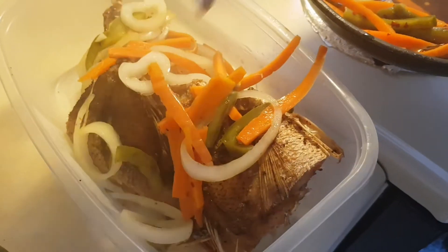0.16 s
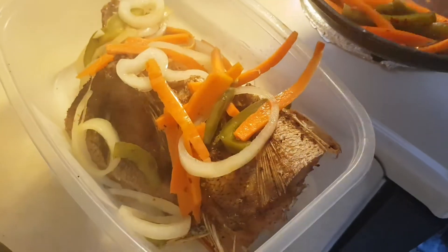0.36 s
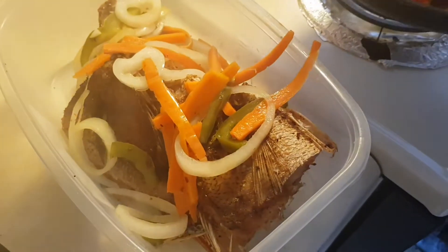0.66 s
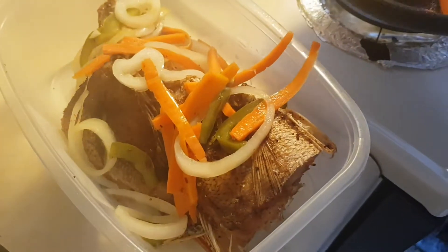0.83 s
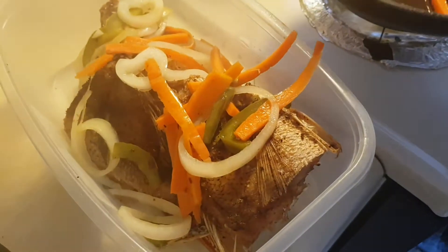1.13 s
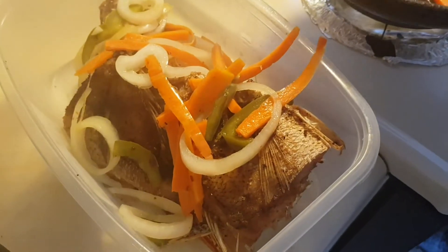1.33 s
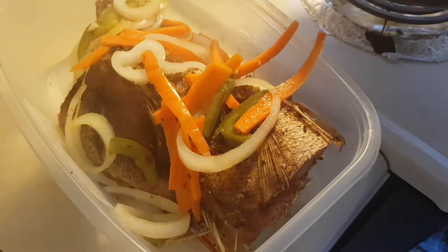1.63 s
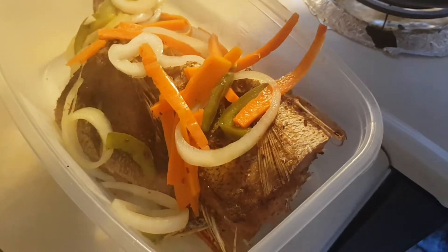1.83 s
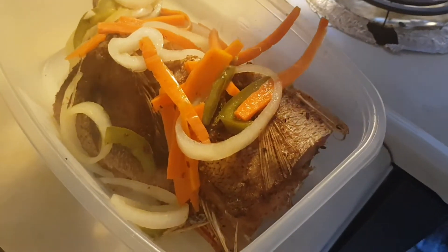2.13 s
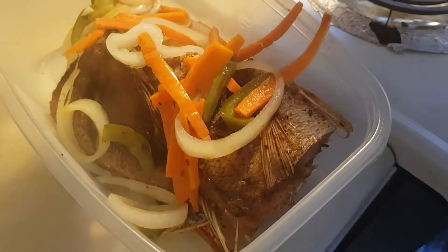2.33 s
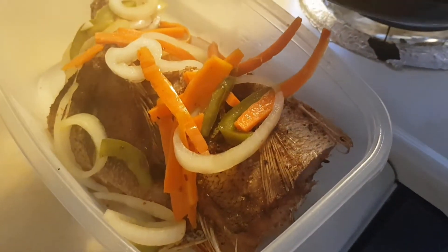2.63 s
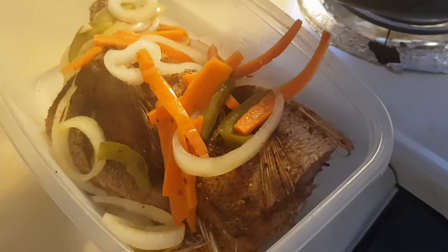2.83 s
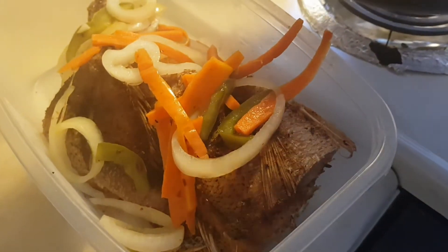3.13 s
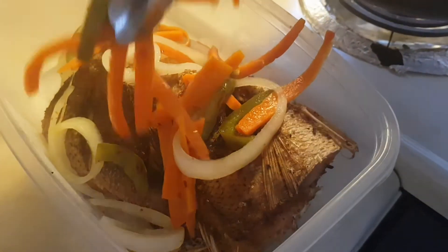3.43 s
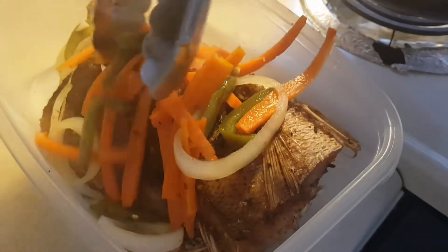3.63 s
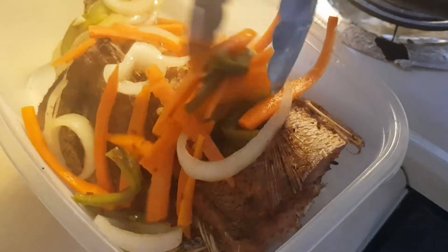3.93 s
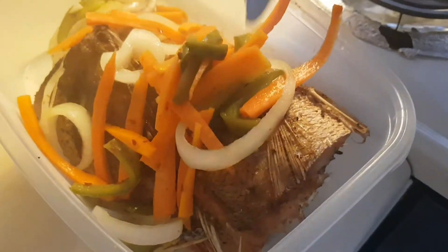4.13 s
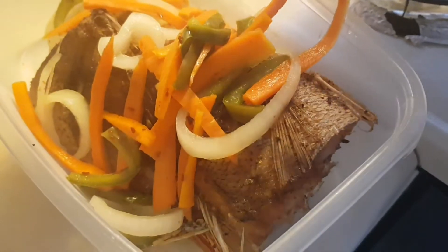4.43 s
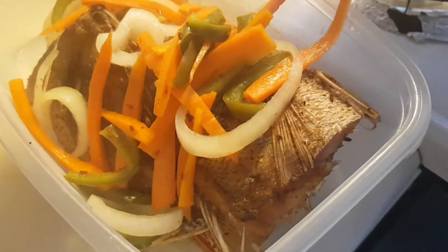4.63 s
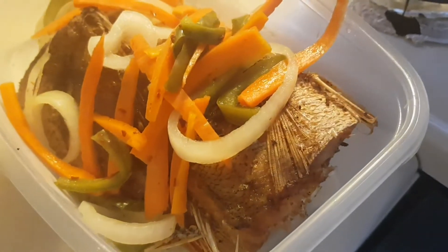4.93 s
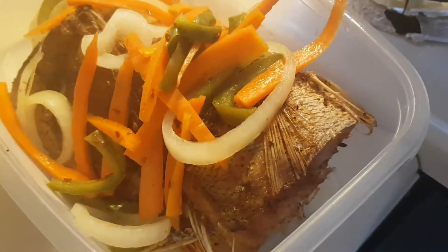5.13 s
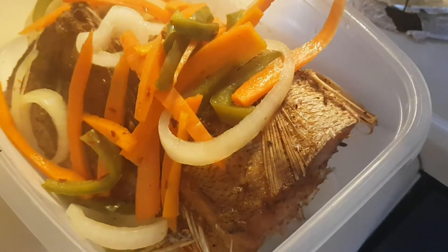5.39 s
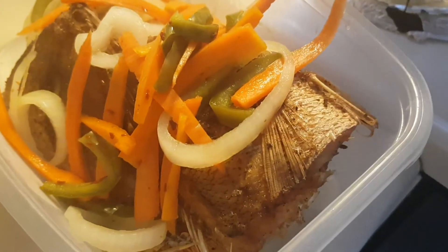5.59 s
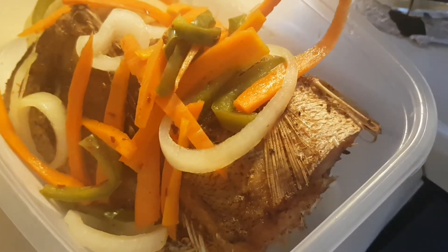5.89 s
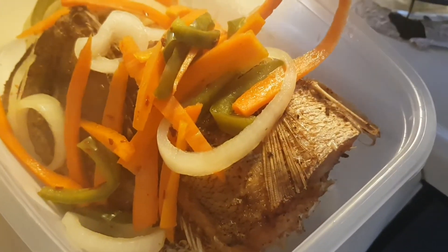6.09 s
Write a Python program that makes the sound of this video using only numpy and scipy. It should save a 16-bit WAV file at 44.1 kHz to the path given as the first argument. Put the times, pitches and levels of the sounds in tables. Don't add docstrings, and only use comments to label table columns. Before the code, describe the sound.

A small, hard-surfaced kitchen heard closely in stereo, with a low fridge motor hum, soft coolant burbling and faint hiss throughout. At the start wet strips land with a tiny hollow plop and slight ticks. Around 0.6 s tongs lightly tap a thin metal pan on the right and drag briefly. At 1.12 s comes the loudest clank, a quick double blow with a duller second half, followed by a scrape until about 1.4 s, a bright tap at 1.47 and a light drag. From 1.8 to 4.6 s only faint tip ticks and soft wet slips emerge, the background rising slightly after 3.5. A sharp closed-tong hit at 4.64 leads to a swelling scrape; a ringing tap at 5.05 and short hit at 5.17 precede a softer drag. A last tap at 5.78 opens a firm, squeaky scrape near 5.95, fading into faint rubbing and a wet slip by 6.2.

```python
import sys
import numpy as np
from scipy import signal
from scipy.fft import rfft, irfft, next_fast_len
from scipy.io import wavfile
from scipy.ndimage import map_coordinates

SR = 44100
rng = np.random.default_rng(int(sys.argv[2]) if len(sys.argv) > 2 else 0)


def master(y):
    cut = np.clip(np.atleast_2d(y).T, -1, 1)
    pcm = np.round(cut * 32767)
    wavfile.write(sys.argv[1], SR, pcm.astype(np.int16))


def elevation(decibels):
    levels = np.asarray(decibels, float)
    return 10 ** (levels / 20)


N = 275801


def unit(x):
    return x / np.sqrt(np.mean(np.abs(x) ** 2) + 1e-20)


def along(points, hz):
    f, v = np.transpose(points)
    return np.interp(np.log(hz + 1), np.log(f + 1), v)


def wobble(rate_hz, size=N):
    knots = rng.standard_normal(int(size * rate_hz / SR) + 4)
    return map_coordinates(knots, [np.arange(size) * rate_hz / SR])


def filtered(x, response):
    n = x.shape[-1]
    m = next_fast_len(n + SR // 8)
    return irfft(rfft(x, m) * response(np.fft.rfftfreq(m, 1 / SR)), m)[..., :n]


def modes(peaks):
    def mode(f, c, w, db):
        return elevation(db) * 1j * f * w / (c * c - f * f + 1j * f * w)
    return lambda f: sum((-1) ** k * mode(f, *peak) for k, peak in enumerate(peaks))


def colour(spectrum):
    return lambda f: elevation(along(spectrum, f))


def normed(response):
    size = np.sqrt(np.mean(np.abs(response(np.linspace(0, SR / 2, num=2500))) ** 2))
    return lambda f: response(f) / size


def grit(spike_db, *shape):
    spikes = np.minimum(rng.exponential(size=shape[-1]), 7)
    return unit(rng.standard_normal(shape) * elevation(spike_db * spikes))


def add_at(out, s, sound):
    out[:, round(s * SR):][:, :sound.shape[-1]] += sound


def placed(pair, alike, lean, lag_s):
    turn = lambda f: np.arccos(np.clip(along(alike, f), -1, 1)) / 2
    mid, side = filtered(pair, lambda f: np.array([np.cos(turn(f)), np.sin(turn(f))]))
    sign = np.array([[1], [-1]])
    ear = lambda f: elevation(along(lean, f) / 2 * sign) * np.exp(-1j * np.pi * f * lag_s * sign)
    return filtered(np.array([mid + side, mid - side]), ear)


# t/s, peak level/dB, knock below peak/dB, brightest f/Hz, t60/s
BLOWS = [
    (0.61, -30, -21, 8300, 0.17),
    (1.1202, -8, -22, 4920, 0.13),
    (1.1637, -19, -2.5, 8550, 0.071),
    (1.474, -21.5, -10, 9430, 0.14),
    (4.639, -13, -16.5, 5340, 0.059),
    (5.0521, -13, -30, 5240, 0.088),
    (5.1749, -11.5, -18.5, 6450, 0.018),
    (5.7769, -18.5, -18, 4950, 0.052),
]
# f/Hz, level/dB per Hz
CLANK = [(710, -39), (1200, 13), (2320, -5), (2620, -5), (2960, -4), (4030, -3.5), (4970, -8), (6690, -9),
         (8620, -6.5), (13400, -19), (16700, -34)]
# f/Hz, width/Hz, level/dB
PAN = [(321, 97, -3), (522, 6, -0.5), (660, 26, 4.5), (860, 13.5, 5), (1092, 27, 10.5)]
# f/Hz, width/Hz, level/dB
STEEL = [
    [(1850, 57, -3), (4730, 39, 3), (5300, 38, 2), (8550, 88, -3), (11700, 36, -10)],
    [(2270, 29, 3), (5040, 26, -3), (6180, 23, -1), (7400, 90, -14), (11900, 23, -13)],
    [(3750, 110, -7), (6080, 130, -7), (8300, 97, -12), (9480, 160, -8), (10100, 140, -4)],
    [(3770, 110, -2), (6950, 83, 0), (8130, 260, -8), (10200, 160, -6), (11800, 120, 7.5)],
    [(5050, 45, 0), (6300, 42, -8), (7200, 120, -6), (7850, 41, -6), (9070, 55, 1)],
    [(3720, 48, 2), (4050, 27, -4), (4970, 47, 7), (8730, 30, -4), (13300, 54, -5)],
    [(1920, 29, 0), (3970, 35, 4), (6260, 65, -8), (7400, 31, -5), (8700, 92, -11)],
    [(1810, 150, 7), (3730, 32, -2), (5060, 82, 0), (6420, 22, 4), (8370, 33, -12)],
]
# f/Hz, width/Hz, level/dB
ARMS = [
    [(2940, 86, 11.5), (4920, 150, 5), (6030, 160, 9)],
    [(5240, 180, 17), (5980, 180, 8), (8520, 170, 12)],
]
THIN_HZ = [1980, 1940]
TREBLE_DB_PER_OCT, LEAD_DB = [-11, -2.5], [-20, -14]
FREE_DB_PER_S, STEEL_DB = 77.5, 5


def blows():
    lead_s = 0.004
    out, t = np.zeros((2, N + SR)), np.arange(SR // 4) / SR - lead_s
    hit = t >= 0
    for (s, db, knock_db, hz, t60), ring in zip(BLOWS, STEEL):
        closed = s > 2
        lead = (t < 0) * elevation(LEAD_DB[closed] + 3500 * t)
        decay = elevation(-60 * t / 0.028) + 0.39 * elevation(-60 * t / t60) + 0.022 * elevation(-60 * t / 1.2)
        shape = lead + hit * decay
        slope_db = TREBLE_DB_PER_OCT[closed] + FREE_DB_PER_S * t60
        thin = lambda f: 1 / (1 + (THIN_HZ[closed] / (f + 1)) ** 6)
        tilt = lambda f: elevation(slope_db * np.log2((f + 500) / 5000)) * thin(f)
        favour = lambda f: 1 + 0.55 * np.exp(-np.log2((f + 1) / hz) ** 2 / 0.12)
        bright = lambda f: colour(CLANK)(f) * tilt(f) * favour(f)
        damped = [(c, max(w, 90), level + STEEL_DB - along(CLANK, c) / 2) for c, w, level in ring]
        resonant = modes(damped + ARMS[closed] + [(hz, 200, 7)])
        steel = normed(lambda f: bright(f) * (elevation(3.5) + resonant(f)))
        shove = hit * elevation(-60 * t / 0.0006) * [[1], [0.3]]
        clank = filtered(shape * grit(1.5, 2, len(t)) + 3 * shove, steel)
        push = 3.5 * shove + 0.2 * hit * elevation(-60 * t / 0.1) * grit(1.5, 2, len(t))
        body = [(c, max(w, 40), level) for c, w, level in PAN]
        knock = filtered(push, normed(modes(body + [(1560, 1900, -4.5)])))
        add_at(out, s - lead_s, elevation(db - 5.5) * (clank + elevation(knock_db + 7.5) * knock))
    return out[:, :N]


# t/s, peak level/dB, f/Hz, t60/s
CHIMES = [
    (1.121, -22, 2343, .12),
    (1.123, -24, 3010, 0.1),
    (1.121, -27, 3810, 0.091),
    (1.121, -32, 9600, .04),
    (1.124, -36, 658, 0.36),
    (4.64, -19, 8500, .03),
    (5.054, -25, 8500, 0.027),
    (5.053, -22, 5270, 0.032),
    (5.175, -20, 6100, .025),
    (5.777, -25, 5100, 0.032),
]


def chimes():
    out, t = np.zeros((2, N + SR)), np.arange(SR // 8) / SR
    for s, db, hz, t60 in CHIMES:
        main = np.sin(2 * np.pi * hz * t + np.array([[0], [1.3]]))
        pair = main + 0.2 * np.sin(2 * np.pi * hz * 0.95 * t)
        onset = 1 - np.exp(-t / 0.0026)
        add_at(out, s, elevation(db - 60 * t / t60) * onset * pair * [[1], [0.3]])
    return out[:, :N]


def dense(t60):
    t = np.arange(SR // 8) / SR
    ring = rfft(unit(rng.standard_normal(len(t)) * elevation(-60 * t / t60)), SR) / np.sqrt(len(t))
    return lambda f: 0.65 + ring[np.round(f).astype(int)]


# t/s, level/dB
STROKES = [
    [(0.614, -38.5), (0.626, -45), (0.64, -44.5), (0.738, -41.5), (0.78, -69)],
    [(1.49, -53), (1.542, -53.5), (1.564, -49.5), (1.616, -49.5), (1.65, -51.5), (1.728, -62.5),
     (1.734, -66), (1.76, -70)],
    [(4.66, -45), (4.67, -45), (4.71, -39.5), (4.774, -32), (4.794, -35), (4.83, -62)],
    [(5.24, -52.5), (5.275, -44), (5.385, -41.5), (5.42, -66)],
    [(5.83, -55), (5.868, -41.5), (5.922, -33.5), (5.962, -34.5), (6.0, -37.5), (6.035, -43), (6.07, -58)],
    [(6.0, -51), (6.045, -46.5), (6.088, -50.5), (6.124, -49.5), (6.176, -63), (6.24, -54.5)],
]
# t/s, level/dB
LONG_STROKE = [(1.185, -44), (1.207, -47.5), (1.235, -43), (1.259, -35.5), (1.297, -33.5), (1.335, -41),
               (1.395, -45), (1.45, -75)]
# f/Hz, width/Hz, level/dB
TONGS = [
    [(4720, 230, -7.5), (8650, 90, -10)],
    [(3700, 540, -9), (4920, 22, 0), (8200, 200, -14), (9600, 190, -8.5), (11700, 99, -7)],
    [(2280, 63, -13), (8200, 190, -7), (11740, 250, 2)],
    [(8030, 150, -13), (8700, 90, -14)],
    [(3530, 200, -10), (6650, 200, -10), (8700, 170, -10)],
    [(6100, 90, -12), (9900, 150, -12), (11570, 92, -5)],
    [(2660, 34, -13), (6100, 70, -9)],
]
# f/Hz, width/Hz, level/dB
RINGS = [([(693, 150, -3), (1176, 54, 7)], [(1820, 150, 4), (2370, 52, -7)]), ([(460, 60, -18),
         (810, 19, -10), (930, 19, -6), (1200, 280, -7)], [(1660, 27, -3), (1710, 53, 7.5), (2390, 76, 6)]),
         ([(497, 130, 2), (683, 94, 10.5), (1165, 160, 13.5)], [(1800, 150, -2), (2350, 150, -11)]),
         ([(660, 87, -8.5), (1200, 31, -5.5)], [(1710, 99, 7), (2180, 48, -19)]), ([(705, 81, 4),
         (953, 19, 1)], [(1540, 480, -1), (2170, 29, -4.5)]), ([(476, 160, -5.5), (790, 44, 3.5),
         (1230, 23, 1)], [(1790, 96, 6), (2060, 37, 0)]), ([(467, 110, -14.5), (780, 63, -4),
         (1200, 44, -6.5)], [(1450, 66, -15.5), (1820, 210, -10.5)])]
# low pan/dB, middle pan/dB, treble lift/dB, low pan gain start to end/dB,
# pan brightness at start/dB per octave
GRIP = [(-9.5, -9, 12, 15, -9.5), (1.5, -4.5, 13.5, 11, 10), (9, -2.5, 5.5, -0.5, 2),
        (-9.5, -14.5, 13.5, 10, -5), (-8, -5, 16, 17, -3.5), (-9.5, -5, 9, -7, -2.5), (8, 8, 12, 2, 0)]
NOTCH_HZ = [6800, 7260, 6950, 6800, 6900, 8300, 8000]
# f/Hz, level/dB per Hz
RASP = [(880, -26), (1500, -21), (1780, -7.5), (2150, -6.5), (5310, -9.5), (6050, -12), (6760, -22),
        (9790, -24.5), (15200, -44), (16000, -59), (16500, -79)]
RASP_DB, PAN_DB, MIN_WIDTH_HZ = 3, -3.5, 110


def pressure(rows):
    s, db = np.transpose(rows)
    s = np.r_[s[0] - 0.01, s, s[-1] + 0.01]
    return np.interp(np.arange(N) / SR, s, np.r_[-100, db, -100])


def scrapes():
    out = np.zeros((2, N))
    strokes = sorted([LONG_STROKE, *STROKES], key=lambda rows: rows[0][0])
    for rows, (low, middle), tongs, grip, notch_hz in zip(strokes, RINGS, TONGS, GRIP, NOTCH_HZ):
        low_db, middle_db, treble_db, gain_db, slide_db = grip
        begin_s, end_s = rows[0][0], rows[-1][0]
        part = slice(round((begin_s - 0.03) * SR), round((end_s + 0.13) * SR))
        press_db = pressure(rows)[part] + RASP_DB
        size = len(press_db)
        slips = unit(elevation(1.2 * wobble(85.3, size) + 1.5 * wobble(30.7, size)))
        travel = (np.arange(size) / SR - 0.03) / (end_s - begin_s) - 0.5
        spot = np.pi / 4 * (1 + np.tanh(2.2 * travel + 0.96 * wobble(11.5, size)))
        spots = np.array([[np.cos(spot)], [np.sin(spot)]])

        def force(db):
            return elevation(press_db + db + 1.3 * wobble(40.3, size)) * slips * grit(1.6, 2, size) * spots

        here, there = dense(0.058), dense(0.073)
        crowd = lambda f: np.array([[here(f)], [there(f)]])
        steel = lambda f: colour(RASP)(f) * crowd(f) * (elevation(-14.5) + np.abs(modes(tongs)(f)))
        high = lambda f: 1 / (1 + (notch_hz / (f + 1)) ** 12)
        tips = lambda f: steel(f) * (1 - high(f) + elevation(treble_db) * high(f))
        octave = lambda f: np.log2(np.clip(f, 500, 2600) / 1300)
        lean = lambda f: elevation(slide_db * octave(f) * [[[1]], [[-1]]])

        def pan(peaks):
            wet = modes([(c, max(w, MIN_WIDTH_HZ), db) for c, w, db in peaks])
            return lambda f: wet(f) * (0.4 + crowd(f)) * lean(f)

        bodies = [(0, tips), (PAN_DB + low_db + gain_db * travel, pan(low)), (PAN_DB + middle_db, pan(middle))]
        for level_db, body in bodies:
            out[:, part] += filtered(force(level_db), normed(body)).sum(axis=0)
    return out


# middle t/s, length/s, peak level/dB, f/Hz
SINGS = [(0.618, 0.014, -44, 1850), (0.647, 0.038, -50, 1850), (0.651, 0.048, -48.0, 668),
         (0.662, 0.017, -36, 1870), (0.663, 0.022, -44, 2360), (0.707, 0.037, -46, 664),
         (0.721, 0.024, -46, 780), (0.722, 0.033, -40, 1160), (0.75, 0.016, -43, 2140),
         (1.259, 0.042, -33, 2390), (1.255, 0.084, -35.5, 790), (1.269, 0.038, -34.5, 1810),
         (1.291, 0.013, -24.5, 1850), (1.299, 0.017, -27, 1280), (1.3, 0.018, -28, 1610),
         (1.315, 0.017, -31, 1226), (1.336, 0.026, -26, 1225), (1.504, 0.017, -28.5, 780),
         (1.55, 0.012, -27, 650), (1.573, 0.03, -32.5, 1217), (1.584, 0.04, -38.5, 680),
         (1.603, 0.028, -35, 704), (1.625, 0.012, -36, 726), (1.717, 0.013, -37.5, 1300),
         (4.625, 0.012, -28.5, 550), (4.749, 0.039, -35, 664), (4.774, 0.039, -40, 1720),
         (4.809, 0.019, -33, 1730), (5.185, 0.019, -30, 730), (5.261, 0.021, -42, 704),
         (5.268, 0.018, -48.0, 1650), (5.304, 0.028, -39, 1640), (5.317, 0.04, -42.5, 716),
         (5.337, 0.038, -45, 1450), (5.372, 0.022, -35.5, 1470), (5.375, 0.041, -43, 2120),
         (5.38, 0.021, -36.5, 687), (5.876, 0.02, -34, 1790), (5.941, 0.015, -34, 1790),
         (5.958, 0.014, -26, 1790), (5.976, 0.027, -31.5, 780), (5.982, 0.015, -14, 1790),
         (6, 0.055, -31.5, 1235), (6.008, 0.014, -27, 1790), (6.019, 0.022, -31, 738),
         (6.028, 0.014, -23, 1730), (6.053, 0.018, -34, 1770), (6.121, 0.025, -36, 780),
         (6.246, 0.03, -33, 810),
         (0.636, .016, -32, 4970), (1.265, .045, -33, 4980), (1.3, .035, -36, 3820),
           (1.4, 0.06, -35, 766), (1.638, 0.04, -41, 724), (1.6, 0.032, -40, 1170),
           (1.659, 0.036, -45, 1240), (3.953, 0.028, -50, 2650), (3.955, 0.034, -53, 1600),
           (3.985, 0.01, -49, 1300), (4.743, .018, -36, 6000), (4.786, 0.022, -31, 8030),
           (5.09, .04, -38, 3860), (4.705, .045, -33, 4800), (4.67, .012, -36, 3900),
           (4.772, .014, -26, 3700), (5.892, .02, -34, 4600), (5.897, .024, -32, 4080),
           (5.97, .045, -39, 10100), (5.987, .05, -39, 4600), (5.197, 0.035, -37, 3800),
           (5.923, 0.025, -23.5, 6140)]


def sings():
    half_s, rise, fall = 0.06, 0.43, 0.38
    out, t = np.zeros((2, N + SR)), np.arange(SR // 8) / SR - half_s
    for s, length_s, db, hz in SINGS:
        swell = elevation(db - 2 - 6 * (t / (length_s * np.where(t < 0, rise, fall))) ** 2)
        size = 1 + 0.25 * wobble(148, len(t))
        phase = np.array([[0], [1.3]]) + 0.82 * wobble(67.5, len(t)) + 7 * rng.random()
        tone = size * np.sin(2 * np.pi * hz * t + phase)
        add_at(out, s - half_s, swell * tone * [[1], [0.3]])
    return out[:, :N]


# t/s, peak level/dB, centre f/Hz, t60/s
TOUCHES = [(0.039, -49.5, 1820, 0.24), (0.2727, -38, 1310, 0.036), (0.8275, -50, 1490, 0.086),
           (1.215, -47, 790, 0.26), (1.82, -39.5, 1230, 0.037), (1.842, -44.5, 1320, 0.029),
           (2.148, -45, 2660, 0.13), (2.149, -46.5, 1300, 0.12), (2.9656, -45, 1200, 0.022),
           (3.2114, -49.5, 1310, 0.042), (3.553, -52, 1070, 0.083), (3.93, -47.5, 1470, 0.42),
           (3.935, -49.5, 2480, 0.3), (4.029, -43.5, 3960, 0.044), (4.127, -48, 1270, 0.042),
           (4.334, -44, 1300, 0.039), (5.865, -36, 630, 0.12), (6.216, -40, 1220, 0.47)]
# t/s, peak level/dB, centre f/Hz, band/octaves, t60/s
TICKS = [(0.004, -43, 4970, 2.8, 0.16), (0.034, -42.5, 6100, 1.7, 0.11), (0.813, -38.5, 4470, 1.5, 0.12),
         (1.8, -44, 8900, 1, 0.058), (1.832, -48, 8350, 0.95, .04), (1.95, -47, 2300, 0.86, 0.2),
         (1.733, -47, 6000, 0.65, .05), (2.1314, -47.5, 6950, 0.84, 0.054), (2.144, -45, 3500, 1.4, .1),
         (2.347, -52, 6000, 0.88, .04), (2.411, -42.5, 6460, 1.1, 0.036), (2.637, -50.5, 13500, 0.54, .05),
         (2.8196, -46.5, 8200, 1.1, .06), (3.2, -51, 6500, 0.61, .06), (3.418, -46, 7500, 1.1, .05),
         (4.02, -35, 7500, 2.5, 0.057), (4.3196, -42, 5500, 1.8, 0.082), (4.925, -35.5, 3450, 1.46, 0.076),
         (5.437, -40, 4200, 1.5, .06), (5.603, -42.5, 7500, 1.3, .05)]
SLIP_OCTAVES, NARROWS_PER_DB = 0.5, 0.017


def touches():
    out, t = np.zeros((2, N + SR)), np.arange(SR // 6) / SR
    slip_band = lambda db: max(SLIP_OCTAVES - NARROWS_PER_DB * (db + 52), 0.12)
    slips = [(s, db, hz, slip_band(db), t60) for s, db, hz, t60 in TOUCHES]
    for s, db, hz, octaves, t60 in slips + TICKS:
        bell = lambda f: np.exp(-(np.log2((f + 1) / hz) / octaves) ** 2)
        spill = lambda f: 0.13 * min(octaves, 0.6) ** 2 * (f > hz / 2)
        band = normed(lambda f: (bell(f) + spill(f)) / (1 + (f / 14500) ** 6))
        onset = 1 - np.exp(-t / (0.025 * t60))
        puff = filtered(elevation(-60 * t / t60) * onset * grit(2.96, 2, len(t)), band)
        add_at(out, s, elevation(db + 4.5) * puff / np.abs(puff).max())
    return out[:, :N]


# f/Hz, level/dB, t60/s
PLOP = [(241, 5, 0.23), (470, -13, 0.22), (627, -34, 0.31), (657, -16.5, 0.31)]


def plop():
    out, t = np.zeros((2, N)), np.arange(SR // 6) / SR
    for hz, db, t60 in PLOP:
        out[0, :len(t)] += elevation(db - 34 - 60 * t / min(t60, 0.19)) * np.sin(2 * np.pi * hz * t + 3.63)
    return out


# f/Hz, t60/s
WALLS = [(200, 0.34), (1500, 0.21), (10000, 0.0052)]


def walls(x):
    hz, t, z = signal.stft(rng.standard_normal((2, SR // 2)), SR, nperseg=256)
    tail = signal.istft(z * elevation(-60 * t / along(WALLS, hz)[:, None]), SR, nperseg=256)[1]
    delayed = np.pad(x, (300, 0))[None]
    return signal.fftconvolve(delayed, tail / np.linalg.norm(tail[0]), axes=1)[:, :N]


MOTOR_HZ = [59.38, 98]
# multiple, level/dB
ORDERS_DB = [
    [(1, -0.5), (2, -14.5), (3, -14), (4, -14), (5, -15), (6, -29.5)],
    [(1, -10.5), (2, -9.5)],
]
# f/Hz, level/dB per Hz
RUMBLE = [(15, -37), (25, -16), (48, -2.5), (70, -2.5), (139, -8), (200, -10.5), (243, -12.5), (311, -16.5),
          (366, -19), (480, -29.5), (620, -41), (1060, -120)]


def hum(level_db):
    t = np.arange(N) / SR
    lines = np.zeros(N)
    for hz, orders in zip(MOTOR_HZ, ORDERS_DB):
        for k, db in orders:
            phase = 0.14 * wobble(1.97) + 7 * rng.random()
            lines += elevation(db + 1.68 * wobble(2.87)) * np.sin(2 * np.pi * k * hz * t + phase)
    rumble = unit(filtered(rng.standard_normal((2, N)), colour(RUMBLE)))
    return elevation(level_db) * (elevation(-0.5) * unit(lines) * [[1], [0.1]] + elevation(-4) * rumble)


# f/Hz, level/dB per Hz
BURBLE = [(250, -37), (420, -8), (476, -8.5), (526, 0), (582, -5), (775, -2.5), (1020, -37), (1100, -14),
          (1430, -22), (2420, -120)]
# t/s, peak level/dB, f/Hz
GLUGS = [(0.165, -40.5, 564), (0.223, -47, 520), (0.378, -43.5, 622), (0.496, -47, 790), (0.898, -44, 514),
         (1.793, -38, 523), (1.893, -44, 636), (2.056, -43, 522), (2.131, -43.5, 563), (2.274, -45, 550),
         (2.445, -42, 637), (2.506, -47, 536), (2.619, -44.5, 657), (2.837, -43.5, 543),
         (2.966, -43.5, 522), (3.008, -46, 670), (3.309, -61, 660), (3.401, -45, 545), (3.553, -37, 568),
         (3.62, -40, 585), (3.72, -41, 558), (3.751, -39, 668), (3.782, -40, 667), (3.861, -39, 540),
         (4.091, -42, 525), (4.298, -37, 537), (4.337, -37, 522), (4.949, -42, 522), (5.524, -46, 516)]


def burble(level_db):
    flow = elevation(2.6 * wobble(45)) * grit(1.04, 2, N)
    out = elevation(level_db + 2) * unit(filtered(flow, colour(BURBLE)))
    t = np.arange(SR // 8) / SR
    for s, db, hz in GLUGS:
        bubble = np.sin(2 * np.pi * hz * t) + 0.73 * np.sin(2 * np.pi * hz * rng.uniform(1, 1.6) * t)
        onset = 1 - np.exp(-t / 0.0012)
        add_at(out, s, elevation(db - 1.5 - 60 * t / 0.075) * onset * bubble * [[1], [0.4]])
    return out


# f/Hz, level/dB per Hz
HISS = [(530, -29), (900, 4), (1020, -2), (1480, 2.5), (2240, -3), (3970, -4.5), (4430, -2), (5320, -7.5),
        (6010, -7), (6870, -12), (9090, -4.5), (13900, -16), (15200, -13), (15900, -23), (16500, -46)]


def hiss(level_db):
    drift_db = 0.9 * wobble(14) + 0.3 * wobble(2)
    return elevation(level_db + drift_db) * unit(filtered(grit(3, 2, N), colour(HISS)))


# t/s, hum level/dB
GAIN = [(0.15, -48), (1.78, -48), (3.4, -48), (3.65, -44.5), (6.25, -42.5)]
# f/Hz, likeness
ALIKE = [(60, 1), (180, 0.79), (550, 0.52), (1650, -0.24), (4970, 0.18), (15000, 0.39)]
# f/Hz, left minus right level/dB
LEAN = [(60, 2.5), (130, 0), (290, 1.5), (640, 3.5), (1410, 0.5), (3100, 0.5), (6820, -8), (15000, -5)]
BURBLE_DB, HISS_DB, HISS_FOLLOWS = -12, -58.5, 0.71


def kitchen():
    hum_db = np.interp(np.arange(N) / SR, *np.transpose(GAIN)) + 0.98
    hiss_db = HISS_DB + HISS_FOLLOWS * (hum_db - hum_db.min())
    background = hum(hum_db) + burble(hum_db + BURBLE_DB) + hiss(hiss_db)
    return placed(background, ALIKE, LEAN, lag_s=-1.4e-4)


# f/Hz, left-right likeness
NEAR_ALIKE = [(200, 1), (700, 0.73), (1500, 0.23), (2600, 0.068), (8000, 0.049)]
# f/Hz, left minus right level/dB
SHADOW = [(60, -9), (150, -6), (380, 1), (950, -3), (2380, -1), (5980, -6.5), (15000, -16)]


def scene():
    work = blows() + chimes() + scrapes() + sings() + touches() + plop()
    work = placed(work, NEAR_ALIKE, SHADOW, lag_s=1.15e-4)
    return work + elevation(-13.5) * walls(work[1]) + kitchen()


def band_limit(x):
    return signal.sosfilt(signal.butter(12, 16300, fs=SR, output="sos"), x)


def record(dry):
    dip = lambda f: 0.5 * np.exp(-((f - 6950) / 130) ** 2)
    top = lambda f: elevation(-32) + 1 / (1 + (f / 15900) ** 120) - dip(f)
    port = lambda f: top(f) / np.sqrt(1 + (44 / (f + 1)) ** 8)
    x = filtered(dry, port)
    x = x / (1 + np.abs(x / 0.8) ** 4) ** 0.25
    return band_limit(x)


dry = scene()
out = record(dry)
master(out)
```